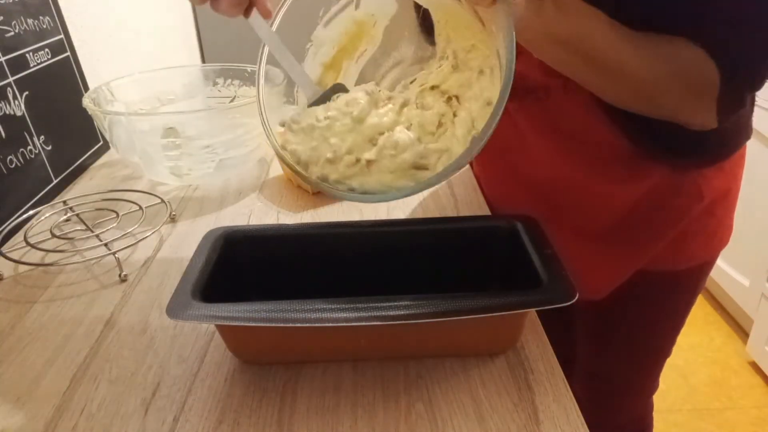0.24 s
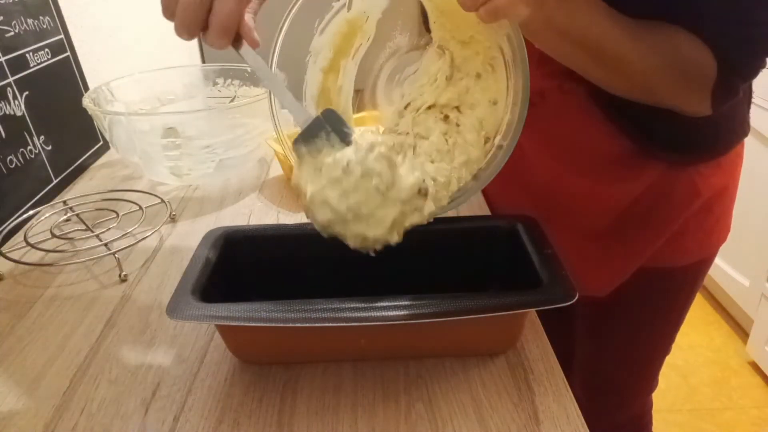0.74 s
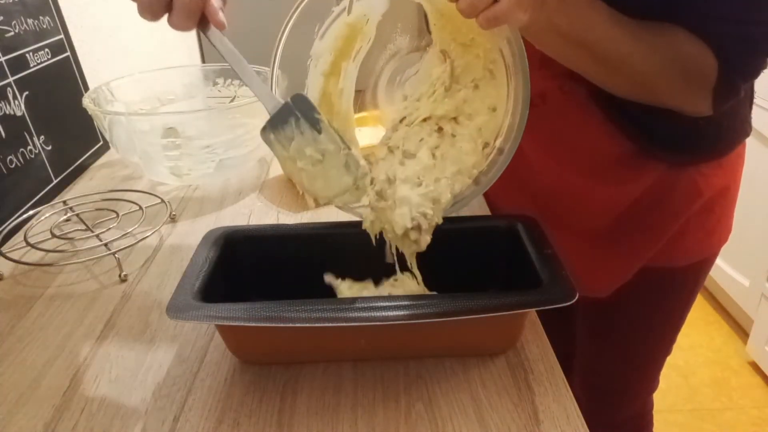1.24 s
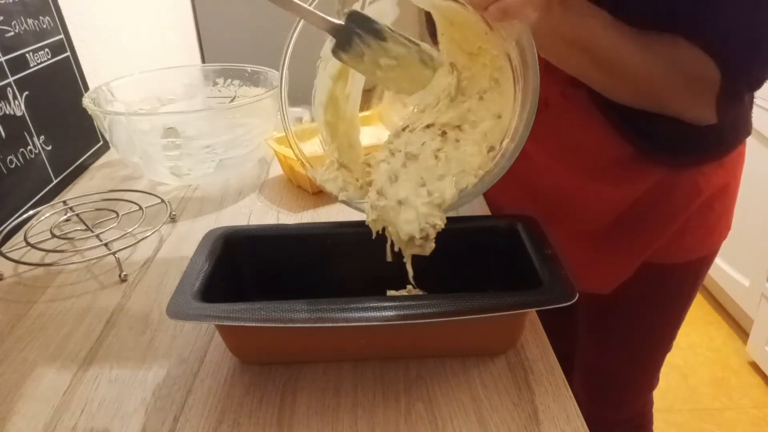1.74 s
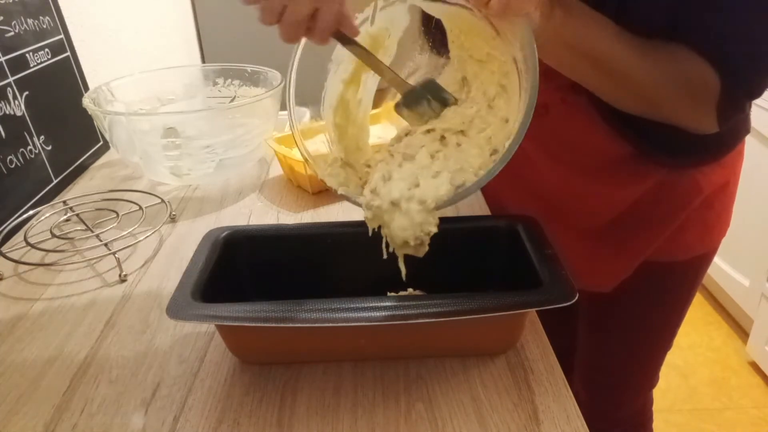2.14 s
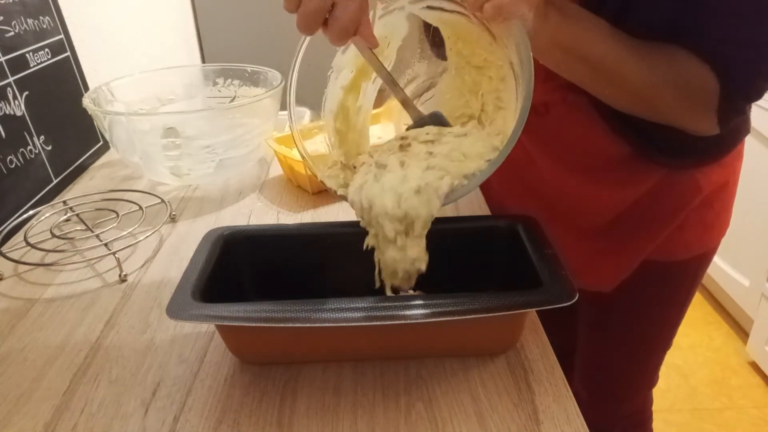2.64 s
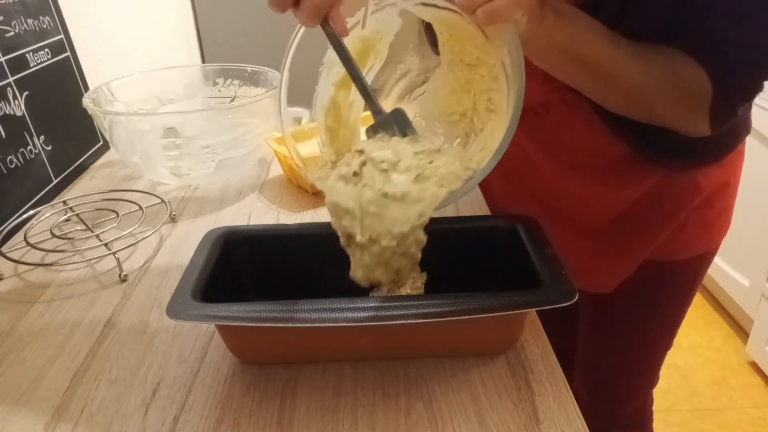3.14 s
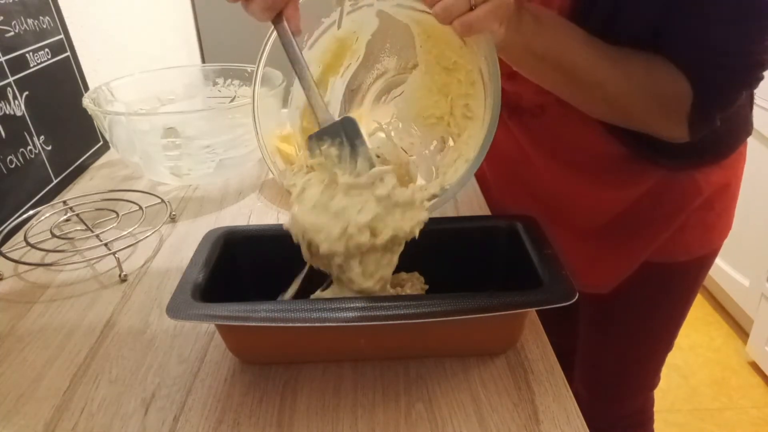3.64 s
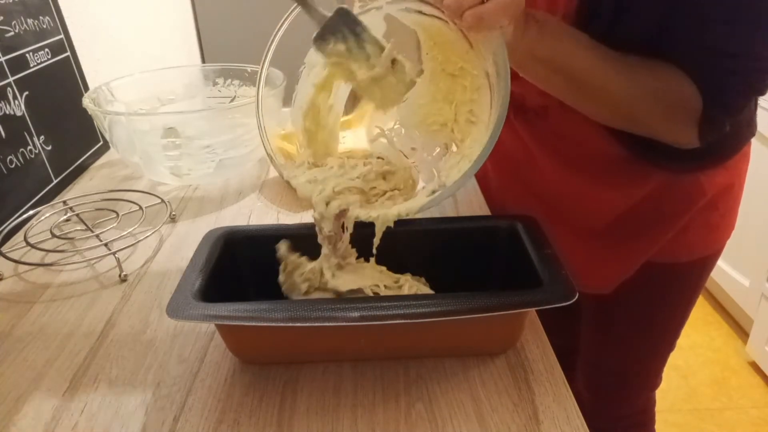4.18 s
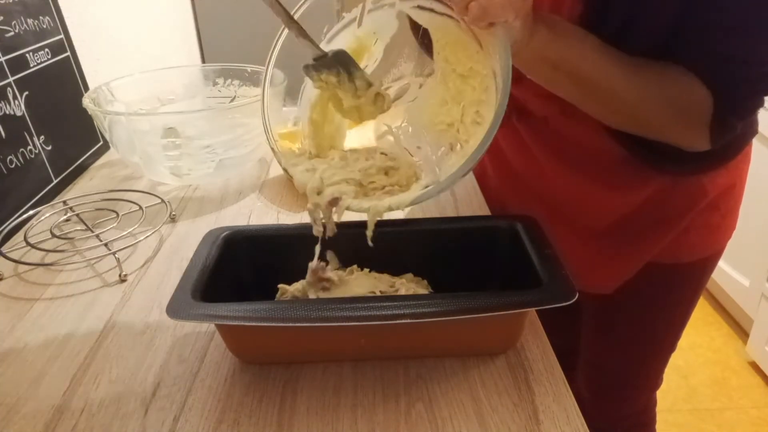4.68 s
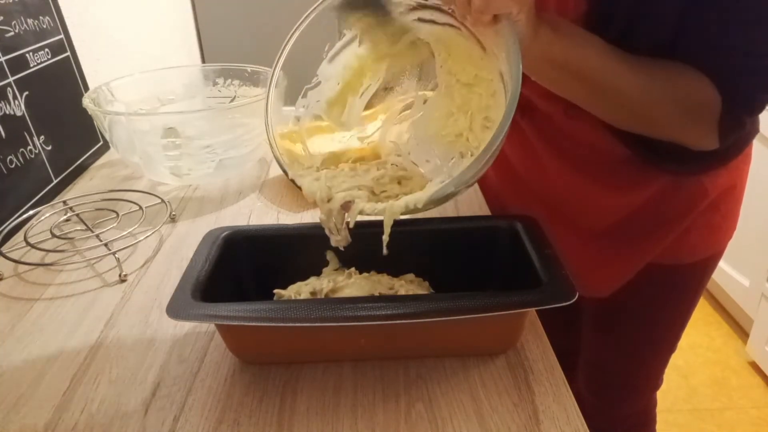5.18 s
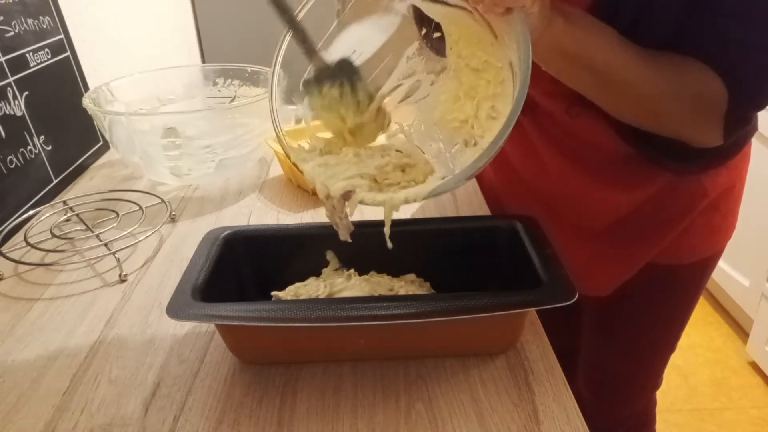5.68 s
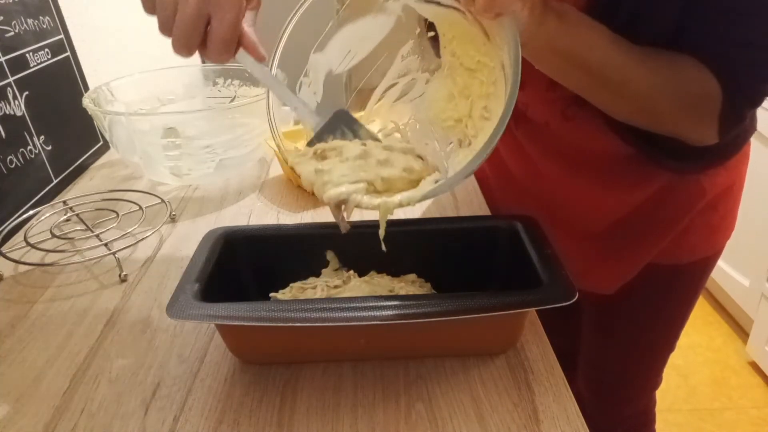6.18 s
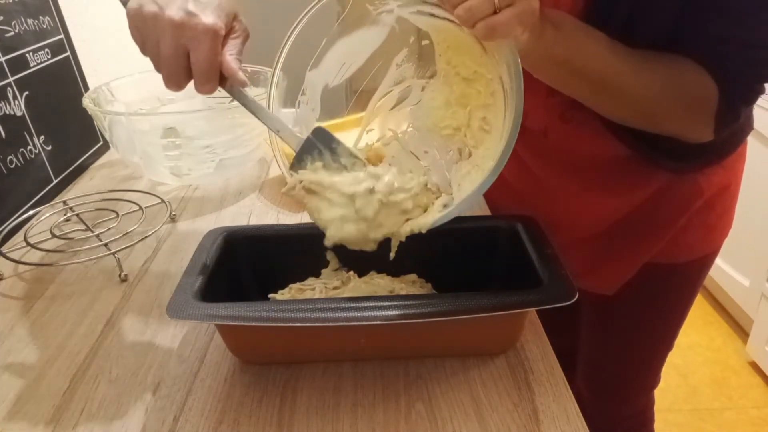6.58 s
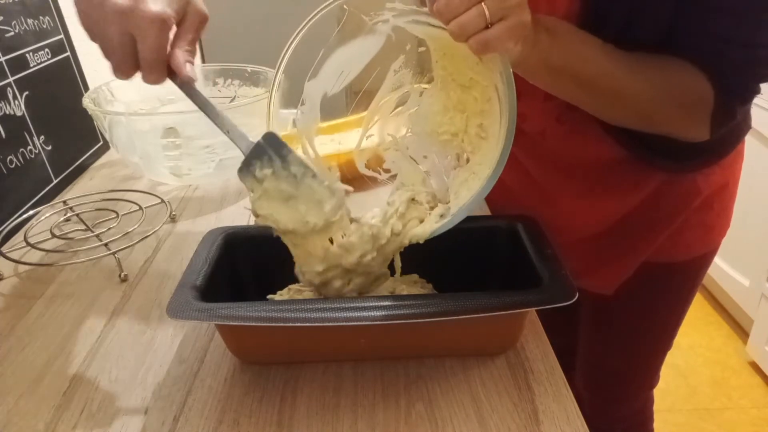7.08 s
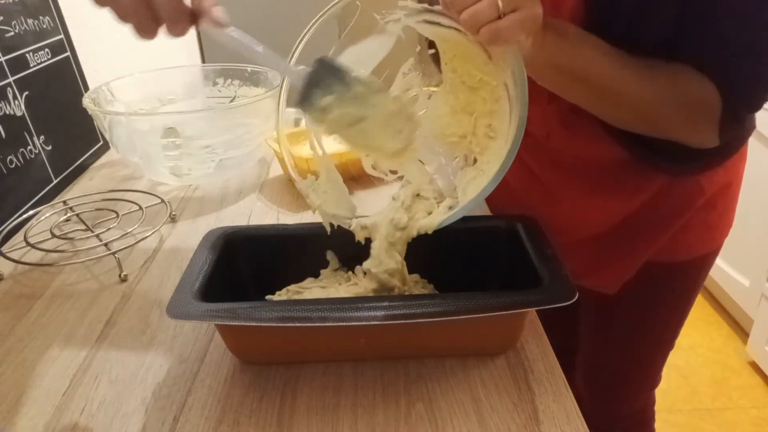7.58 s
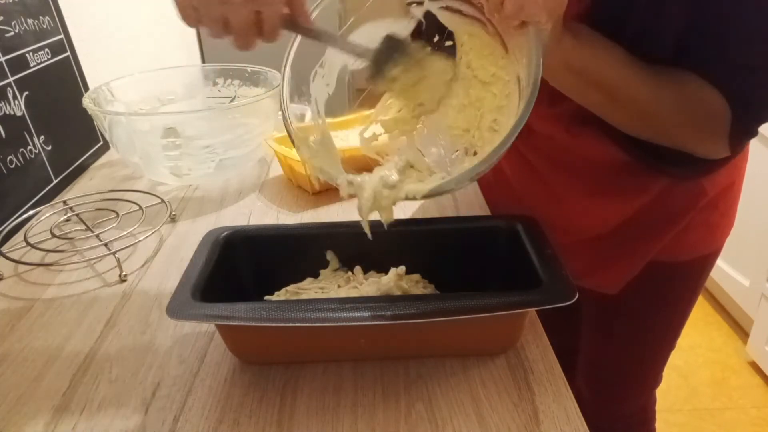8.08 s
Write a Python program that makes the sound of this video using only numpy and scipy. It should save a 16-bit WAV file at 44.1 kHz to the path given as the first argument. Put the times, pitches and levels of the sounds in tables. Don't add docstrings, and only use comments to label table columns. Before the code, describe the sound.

Mostly quiet batter scraping, heard at arm's length with short, lively room reflections. Faint slow drags and small hissing wipes mix with crisp sticky clicks. An early lump gives a low, muted tin thump; a cluster of pops follows. The spatula handle raps the glass rim hard just past the middle, then again later and near the end, each ringing only briefly. A pulsing low machine hum continues throughout.

```python
import sys
import numpy as np
from scipy import signal
from scipy.fft import rfft, irfft, next_fast_len
from scipy.io import wavfile
from scipy.ndimage import map_coordinates

SR = 44100
rng = np.random.default_rng(int(sys.argv[2]) if len(sys.argv) > 2 else 0)


def int16_out(signal):
    q = np.round(np.clip(np.atleast_2d(signal).T, -1, 1) * 32767)
    wavfile.write(sys.argv[1], SR, q.astype(np.int16))


def nominal_scale(level):
    x = np.asarray(level, float) / 20
    return 10 ** x


N = 366912


# t/s, peak level/dB, freedom to ring (0-1), lowest mode f/Hz as the grip leaves it
KNOCKS = [
    (2.0245, -33.5, 0.4, 600),
    (3.7584, -38.5, 0.3, 600),
    (4.553, -3.5, 0.9, 588),
    (4.664, -20, 0.9, 600),
    (4.677, -23, 0.84, 600),
    (5.978, -12.5, 0.37, 527),
    (7.922, -6.5, 0.62, 568),
]
# f/Hz, level/dB
FIRST_RAP = [(200, -16), (330, -6.5), (450, -8), (630, 0), (800, -7.5), (1000, -11), (1400, -5),
             (1800, -8.5), (2300, -6.5), (4300, -6), (6300, -15.5), (9200, -5.5), (12000, -17),
             (15500, -23)]
# f/Hz, level/dB
SECOND_RAP = [(280, -12.5), (450, -1), (700, -6.5), (1200, -0.2), (1700, -18), (2050, -7), (3400, -4.5),
              (4300, -4.5), (5700, -12.5), (6300, -15.5), (7000, -8), (9300, 0.5), (12500, -14),
              (15500, -22)]
# f/Hz, level/dB
THIRD_RAP = [(230, -21), (340, -14), (560, -1.5), (800, -11.5), (1400, -7), (1750, -13.5), (2300, -10),
             (4300, -6.5), (5200, -13), (6200, -18), (7200, -6.5), (9300, -2.5), (12500, -19), (15500, -24)]
# f/Hz, level/dB
KNOCK_COLOURS = [
    [(88, -12), (150, -9), (339, 9), (389, -7), (559, -3.5), (923, -18), (1020, -14.5), (3000, -36),
     (3900, -54), (6600, -120)],
    [(290, -36), (500, -14), (565, -17), (822, 0.5), (1430, -10), (1630, -4.5), (2830, -24), (3810, -11),
     (5800, -28), (7000, -21), (9100, -46), (15400, -120)],
    FIRST_RAP,
    [(1470, -44), (2500, -31), (4800, -13), (5780, -2), (6860, -8), (8270, 4.5), (15300, -16), (16000, -22)],
    [(1470, -47), (2500, -31), (4310, 0), (4800, -3), (6700, -17), (8020, -3), (14900, -20), (16000, -29)],
    SECOND_RAP,
    THIRD_RAP,
]
# f/Hz, width/Hz, level/dB
BOWL = [(600, 80, 5), (1440, 80, 7), (2260, 130, 5), (2990, 60, 4), (3460, 90, 4), (4160, 90, 6),
        (4310, 90, 8), (5700, 110, 6), (8050, 250, 3), (9250, 400, 4), (11350, 150, 4)]


def knocks():
    out = np.zeros(N)
    for (s, db, ring, low_hz), colour in zip(KNOCKS, KNOCK_COLOURS):
        held_modes = [(low_hz, 60, 4.5)] + BOWL[1:]
        lowest_hz = colour[0][0]

        def body(f):
            clank = nominal_scale(along(colour, f)) * np.minimum(f / lowest_hz, 1) ** 4
            return clank * (0.7 + ring * peaks(f, held_modes))

        add(out, s - 0.0004, strike(blow(440, count=12), body, db + 10.5, wet_db=1.7))
    return out


# t/s, peak level/dB
DROP = [
    (1.113, -20),
]
# f/Hz, width/Hz, level/dB
TIN = [(322, 81, -8), (600, 74, -2.5), (970, 48, -1), (1012, 45, 3), (1170, 42, -4.5), (1287, 12, 5.5),
       (1680, 120, -8.5), (2770, 270, -22.5), (4300, 260, -22), (9500, 770, -20.5), (14000, 2600, -28)]


def lump():
    out = np.zeros(N)
    (s, db), = DROP

    def body(f):
        return 0.003 + peaks(f, TIN) / (1 + (f / 9000) ** 2)

    add(out, s + 0.0008, strike(blow(60, count=120), body, db + 14, wet_db=0.3))
    return out


# t/s, peak level/dB, centre f/Hz, spread/octaves
POPS = [(0.0094, -50, 4310, 0.26), (0.0502, -47, 8000, 0.6), (0.3444, -59, 4130, 0.56),
        (0.402, -53, 13000, 0.38), (0.4354, -42, 10400, 0.35), (0.744, -40.5, 9200, 0.11),
        (1.2274, -48.5, 9200, 0.32), (2.0276, -41, 9200, 0.47), (2.182, -33, 6330, 0.65),
        (2.186, -19.5, 6000, 0.45), (2.2783, -24, 9400, 0.33), (2.5112, -38, 9840, 0.23),
        (2.83, -40, 6300, 0.18), (3.2344, -57.5, 3310, 0.78), (3.5068, -39, 10080, 0.37),
        (3.7592, -31.5, 8600, 0.15), (3.9549, -53, 4210, 0.52), (4.0497, -52, 9770, 0.35),
        (4.2247, -58, 4560, 0.32), (4.4862, -55, 6110, 0.56), (6.3174, -57, 14230, 0.5),
        (6.327, -49, 3150, 0.24), (7.221, -53.5, 10590, 0.33), (8.2048, -41, 6000, 0.8),
        (8.309, -37, 9300, 0.35)]
# t/s, peak level/dB
SNAPS = [(0.94, -54), (1.0241, -46.5), (1.3294, -57), (1.9282, -49), (2.0487, -42), (2.2684, -55),
         (2.3326, -42), (2.359, -41), (2.396, -43), (2.4857, -49), (2.532, -44), (2.547, -46), (2.575, -47),
         (2.626, -48.5), (2.917, -43.5), (3.043, -46), (3.2899, -56), (3.4967, -50), (3.652, -52),
         (3.68, -49.5), (3.8896, -50), (4.1894, -55), (5.831, -48), (6.12, -41), (6.3589, -47),
         (6.827, -55), (7.1202, -50), (7.7756, -52), (8.294, -41), (8.3174, -37)]
SNAP_HZ, SNAP_OCTAVES = 9900, 0.53


def ticks():
    out = np.zeros(N)
    snaps = [(s, db, SNAP_HZ, SNAP_OCTAVES) for s, db in SNAPS]
    for s, db, hz, octaves in POPS + snaps:
        spread = np.clip(0.96 * octaves, 0.05, 2)
        edge_gain = 0.2 * nominal_scale(0.26 * (db + 39.5))
        knots = rng.standard_normal(14)

        def colour(f):
            band = np.exp(-0.5 * (np.log2((f + 1) / hz) / spread) ** 2)
            edge = edge_gain * abs(resonance(f, 5500, 16000)) ** 2
            lumps = nominal_scale(3.5 * np.interp(f, np.linspace(0, SR / 2, len(knots)), knots))
            return (band + edge) * lumps * (1 + port(f))

        add(out, s + 0.0006, strike(blow(600, count=10), colour, db + 10.0, wet_db=-7.5))
    return out


def crackle():
    happens = rng.random(N) < 70 / SR
    spikes = happens * nominal_scale(4.4 * rng.exponential(size=N)) * rng.standard_normal(N)
    snaps = filtered(spikes, lambda f: abs(resonance(f, 7900, 7000)) ** 2 * (1 + port(f)))
    return nominal_scale(-84.5) * kitchen(unit(snaps), wet_db=-5.5)[:N]


# f/Hz, level/dB
HISS = [(1470, -40), (2500, -10), (4080, -6.5), (4760, 0), (6060, -8), (9220, 2), (12100, -9), (14900, -16),
        (16000, -12.5)]
# f/Hz, width/Hz, level/dB
SONG = [(1240, 200, -2), (2043, 210, -3.5), (2980, 110, -3.5), (4060, 120, -3.5), (4410, 140, -2.5),
        (5570, 140, -6), (7700, 92, -8)]


def wipe():
    hiss_db, song_db = pressure()
    grain = nominal_scale(2.74 * wobble(180))
    hiss = unit(grain * noise(lambda f: nominal_scale(along(HISS, f))))
    song = noise(lambda f: 0.092 * abs(resonance(f, 3000, 4000)) + peaks(f, SONG) ** 2)
    return nominal_scale(hiss_db - 0.2) * hiss + nominal_scale(song_db - 1.2) * song


# t/s at full pressure, held/s, hiss level/dB, song level/dB
STROKES = [(0.0, 0.03, -54.5, -52), (0.25, 0.04, -68, -63), (0.4, .02, -69.5, -78.5),
           (2.022, 0.082, -57.5, -70), (2.168, .01, -60.5, -67), (2.22, 0.18, -66.5, -70),
           (2.5, 0.15, -69, -72.5), (5.46, 0.071, -62, -73.5), (5.76, 0.077, -73, -83),
           (6.24, 0.13, -69.5, -69.5), (7.77, .03, -74.5, -72), (8.19, .05, -64, -80),
           (8.29, .03, -64.5, -74)]
PRESS_DB_PER_S, LIFT_DB_PER_S = 404, 97
# start t/s, length/s, hiss level/dB
DRAGS = [
    (0.7, 0.71, -74),
    (2.6, 0.77, -75.5),
    (3.3, 1.05, -73),
    (5.3, 0.46, -69),
    (7.95, 0.34, -74),
]
DRAG_SONG_DB = -6


def pressure():
    t = np.arange(0, N + 32, 32) / SR
    strokes = []
    for s, held, hiss, song in STROKES:
        press = PRESS_DB_PER_S * np.maximum(s - t, 0)
        lift = LIFT_DB_PER_S * np.maximum(t - s - held, 0)
        strokes.append(np.c_[[hiss, song]] - press - lift)
    hiss_db, song_db = np.max(strokes, axis=0)
    start, length, db = np.transpose(DRAGS)
    drag_db = 20 * np.log10(arched(start + length / 2, length, db, 0.6) + 1e-6)
    every = np.arange(N) / SR
    return (np.maximum(np.interp(every, t, hiss_db), drag_db),
            np.maximum(np.interp(every, t, song_db), drag_db + DRAG_SONG_DB))


# middle t/s, length/s, level/dB, f/Hz, width/Hz
RUBS = [
    (0.03, .34, -62, 4370, 180),
    (0.03, .3, -63, 620, 250),
    (0.02, .2, -68, 7730, 140),
    (6.32, .26, -74, 2400, 90),
    (6.35, .1, -75, 3200, 90),
    (7.975, .12, -50, 560, 30),
]


def rubs():
    out = np.zeros(N)
    broken = nominal_scale(3 * wobble(40))
    for s, length, db, hz, width_hz in RUBS:
        start = max(s - length / 2, 0)
        rough = rng.standard_normal(SR // 2)
        tone = unit(filtered(rough, lambda f: abs(resonance(f, hz, width_hz)) ** 2))
        add(out, start, tone * arched([s - start], [length], db, 2)[:SR // 2])
    return broken * out


# middle t/s, length/s, rms level/dB
SWELLS = [(0.042, 0.21, -46.5), (0.272, 0.11, -53.5), (0.408, 0.15, -54), (0.813, 0.34, -49.5),
          (0.992, 0.12, -51), (1.124, 0.23, -47.5), (1.27, 0.12, -50.5), (1.431, 0.35, -53.5),
          (2.114, 0.52, -49), (2.42, 0.33, -49), (2.638, 0.29, -56), (2.99, 0.4, -48.5),
          (3.207, 0.096, -54.5), (3.436, 0.41, -54.5), (3.739, 0.11, -55), (4.172, .25, -59.5),
          (4.348, 0.094, -52), (4.628, 0.25, -56), (4.798, .14, -51), (5.142, 0.35, -44),
          (5.312, 0.063, -55), (5.489, 0.16, -52), (5.987, .2, -52), (6.191, 0.29, -55),
          (6.613, .34, -48.5), (7.299, 0.29, -58), (7.611, 0.14, -52.5), (7.79, 0.36, -50),
          (8.068, 0.31, -57.5), (8.36, 0.39, -45)]
BOOM_HZ, LULL_DB = 94.6, -65
# f/Hz, width/Hz, rms level/dB
DRONES = [(68, 8, -70.5), (127, 7.2, -67.5), (165, 7.6, -68.5), (198.8, 17, -69), (320, 45, -70.5),
          (562, 10, -75)]
# f/Hz, rms level/dB
WHINE = (471, -70.5)


def hum():
    middle, length, db = np.transpose(SWELLS)
    size = arched(middle, length, db, 1.5)
    phase = 2 * np.pi * np.cumsum(BOOM_HZ + 3.2 * wobble(11)) / SR
    swelling = size * nominal_scale(0.8 * wobble(14)) * np.sin(phase)
    murmur = nominal_scale(LULL_DB) * wobble(11) * np.cos(phase)
    boom = np.sqrt(2) * (swelling + murmur)

    whine_hz, whine_db = WHINE
    whine_phase = 2 * np.pi * np.cumsum(whine_hz + 0.78 * wobble(3)) / SR
    whine = np.sqrt(2) * nominal_scale(whine_db + 1.2 * wobble(2.8)) * np.sin(whine_phase)

    drones = np.zeros(N)
    for hz, width_hz, level in DRONES:
        drones += nominal_scale(level) * noise(lambda f: abs(resonance(f, hz, width_hz)) ** 2)
    swell = ((size + nominal_scale(LULL_DB)) / nominal_scale(-54.5)) ** 0.15
    return boom + whine + swell * drones


# f/Hz, level/dB
AIR = [(12, -56), (25, -14), (48, -16.5), (72, 0), (106, -2), (152, -8), (207, -7.5), (266, -12.5),
       (414, -10), (463, -6.5), (786, -14.5), (1040, -14), (1710, -22.5), (7470, -33.5), (9600, -36.5),
       (15400, -37)]


def air():
    drift = nominal_scale(0.3 * wobble(2))
    return nominal_scale(-61.5) * drift * noise(lambda f: nominal_scale(along(AIR, f)) * (1 + 0.45 * port(f)))


def strike(force, gain, db, wet_db):
    sound = filtered(force, gain)
    return nominal_scale(db) * kitchen(sound / np.linalg.norm(sound), wet_db)


def blow(width_hz, count):
    f = np.fft.rfftfreq(8192, 1 / SR)
    centres = (np.arange(count) + rng.random(count))[:, None] * SR / 2 / count
    allpass = 1 - 2 * resonance(f + 0.00091, centres, width_hz)
    force = irfft(np.prod(allpass, axis=0), 8192)
    return force * (np.arange(8192) < 4096)


# f/Hz, t60/s
KITCHEN = [(200, .4), (600, .45), (2000, 0.5), (6000, 0.5), (12000, 0.35), (16000, 0.31)]
# t/s, level/dB
WALLS = [
    (.0021, -3.5),
    (.007, -10),
    (.0105, -15.5),
    (.017, -13.5),
    (.024, -18),
]


def kitchen(x, wet_db):
    hz, t, z = signal.stft(rng.standard_normal(SR // 2 + 8192), SR, nperseg=256)
    decay = nominal_scale(-60 * t / along(KITCHEN, hz)[:, None])
    tail = signal.istft(z * decay, SR, nperseg=256)[1]
    tail *= 1 - np.exp(-np.arange(len(tail)) / SR / 0.0025)
    answer = tail / np.linalg.norm(tail)
    for s, db in WALLS:
        answer[round(s * SR)] += nominal_scale(db)
    answer *= nominal_scale(wet_db)
    answer[0] = 1
    return signal.fftconvolve(x, answer)


# f/Hz, width/Hz, level/dB
PORT = (9650, 790, 7.7)


def port(f):
    hz, width_hz, db = PORT
    return nominal_scale(db) * abs(resonance(f, hz, width_hz)) ** 2


def resonance(f, hz, width_hz):
    return 1j * f * width_hz / (hz * hz - f * f + 1j * f * width_hz)


def peaks(f, modes):
    return np.sqrt(sum(abs(nominal_scale(db) * resonance(f, hz, width)) ** 2 for hz, width, db in modes))


def filtered(x, gain):
    m = 2 * next_fast_len(len(x) // 2 + 4096)
    cepstrum = irfft(np.log(gain(np.fft.rfftfreq(m, 1 / SR)) + 1e-6), m)
    cepstrum[1:m // 2] *= 2
    cepstrum[m // 2 + 1:] = 0
    return irfft(rfft(x, m) * np.exp(rfft(cepstrum)), m)[:len(x)]


def noise(gain):
    return unit(filtered(rng.standard_normal(N), gain))


def arched(middle_s, length_s, db, power):
    t = np.arange(0, N + 64, 64)
    phase = np.clip((t / SR - np.c_[middle_s]) / np.c_[length_s], -0.5, 0.5)
    arches = np.abs(np.cos(np.pi * phase)) ** power
    return np.interp(np.arange(N), t, np.atleast_1d(nominal_scale(db)) @ arches)


def wobble(rate):
    knots = rng.standard_normal(int(N * rate / SR) + 4)
    return map_coordinates(knots, [np.arange(N) * rate / SR])


def along(points, hz):
    f, v = np.transpose(points)
    return np.interp(np.log(hz + 1), np.log(f + 1), v)


def unit(x):
    return x / np.sqrt(np.mean(x ** 2) + 1e-20)


def add(track, s, sound):
    at = round(s * SR)
    track[at:at + len(sound)] += sound[:max(len(track) - at, 0)]


def scene():
    return (knocks() + lump() + ticks() + crackle() + wipe() + rubs() + hum() + air())[None]


def top_cut(x):
    return signal.sosfilt(signal.butter(12, 16690, fs=SR, output="sos"), x)


def record(dry):
    def response(f):
        top = nominal_scale(np.interp(f, [15450, 15560, 16600, 16800], [0, -19, -24, -70]))
        bass_loss = (58 / (f + 1)) ** 8 / (1 + (40 / (f + 1)) ** 8)
        return top / np.sqrt(1 + bass_loss)

    heard = filtered(dry[0], response)
    return top_cut(heard[None])


dry = scene()
out = record(dry)
int16_out(out)
```